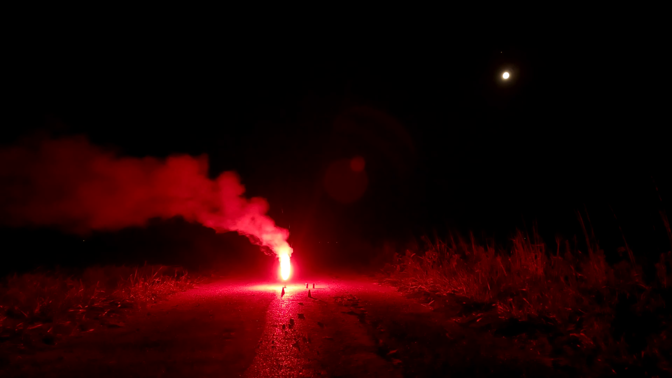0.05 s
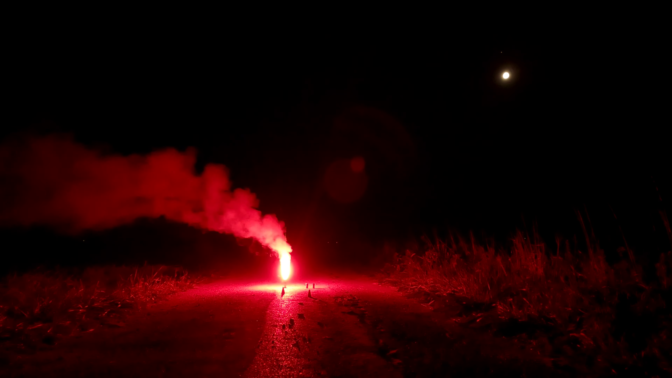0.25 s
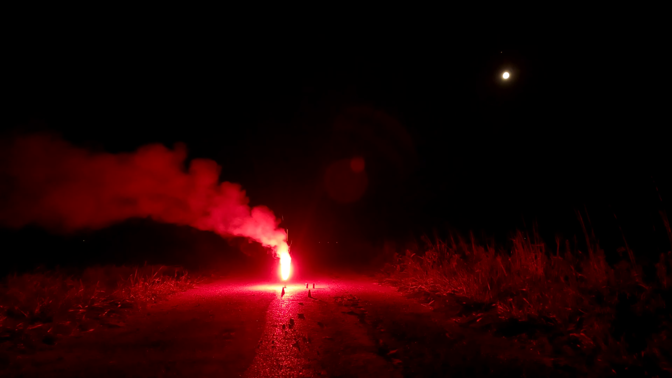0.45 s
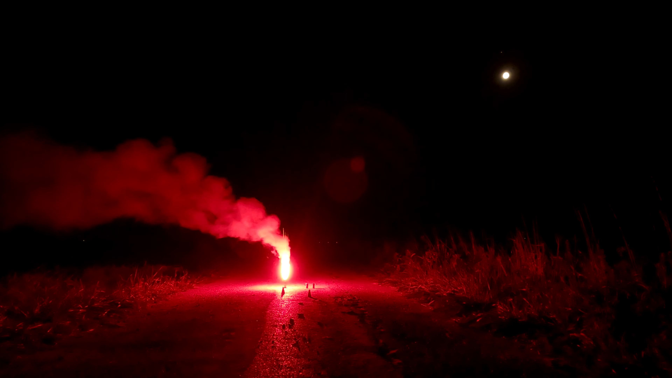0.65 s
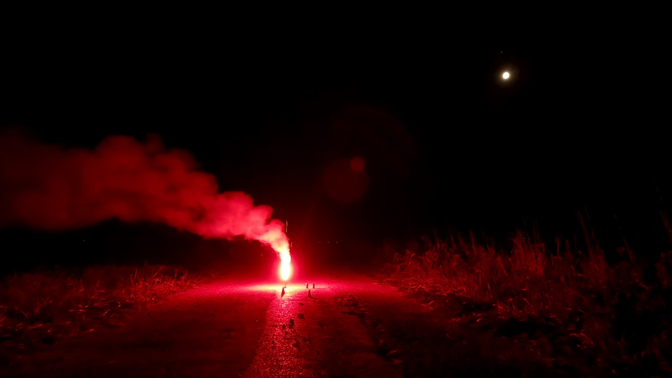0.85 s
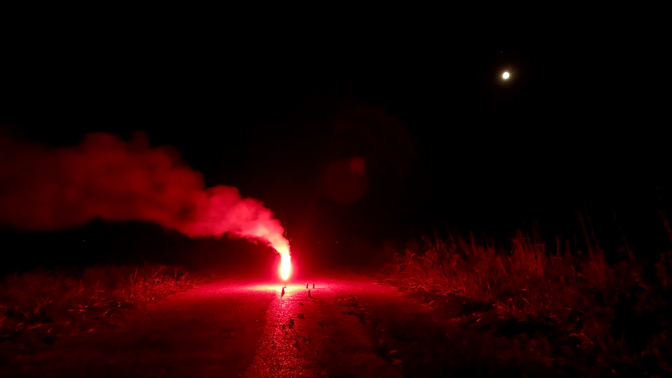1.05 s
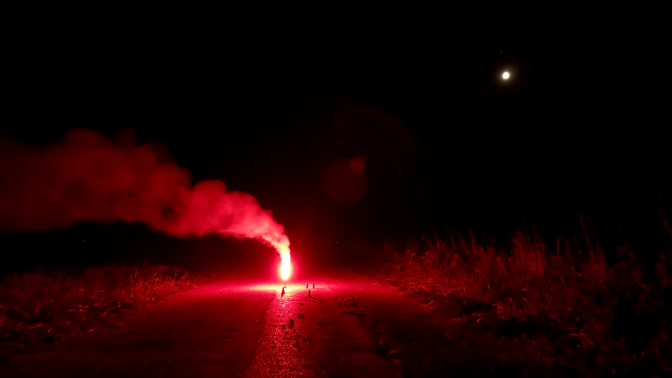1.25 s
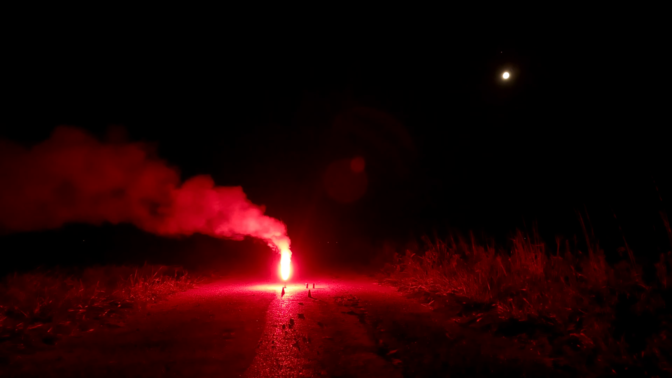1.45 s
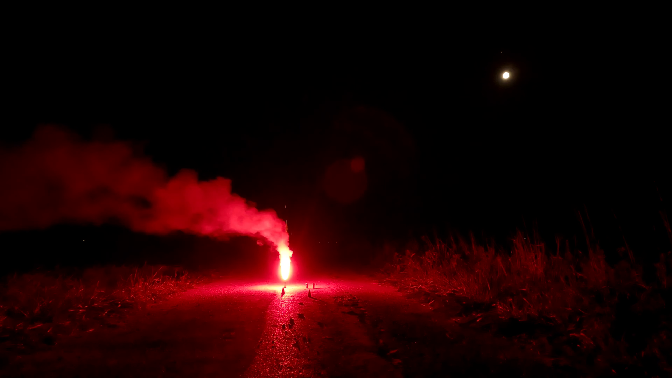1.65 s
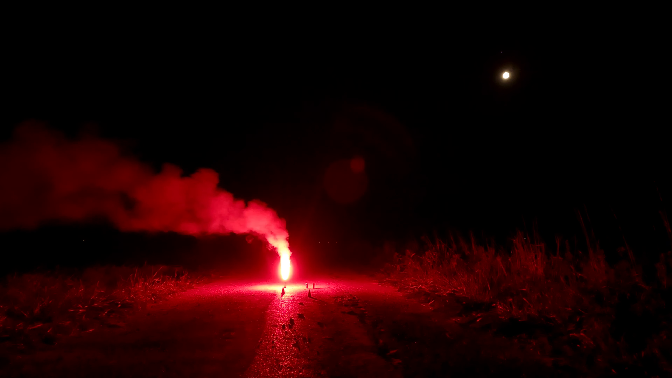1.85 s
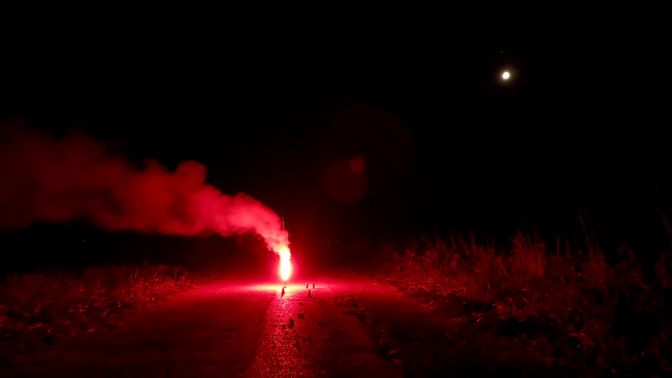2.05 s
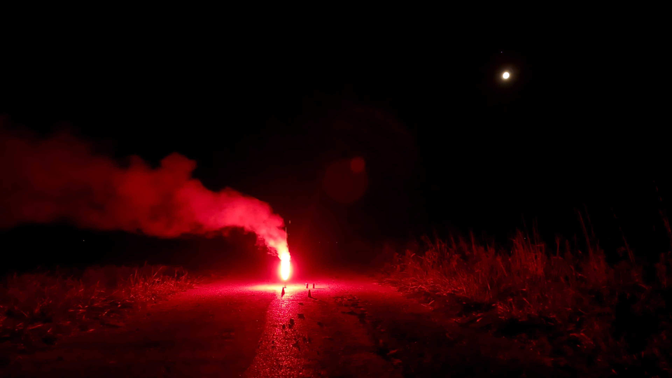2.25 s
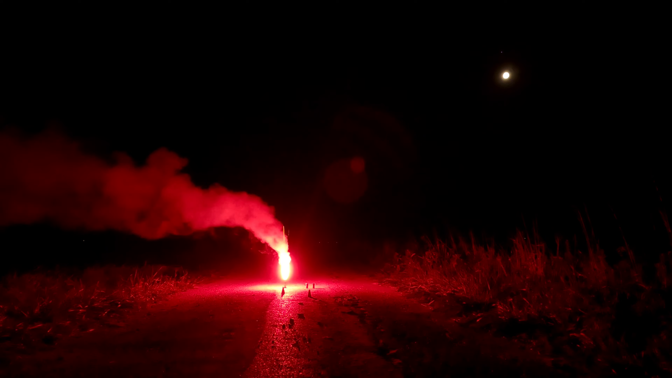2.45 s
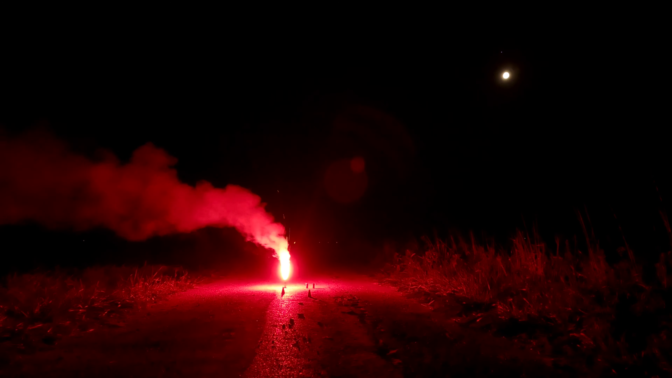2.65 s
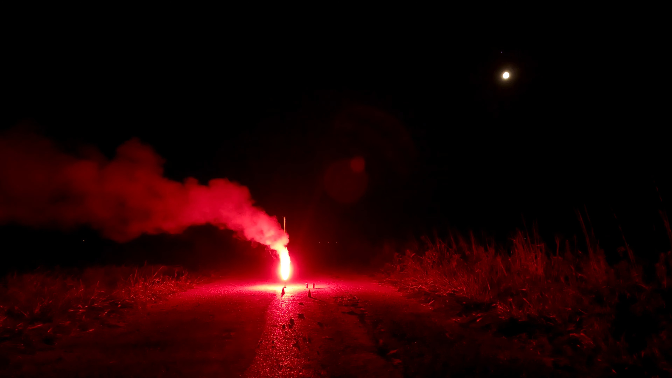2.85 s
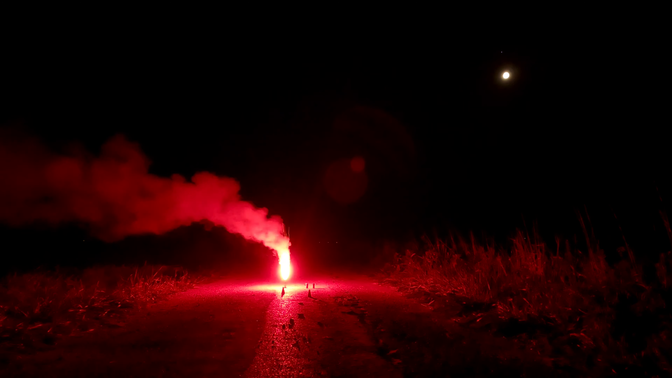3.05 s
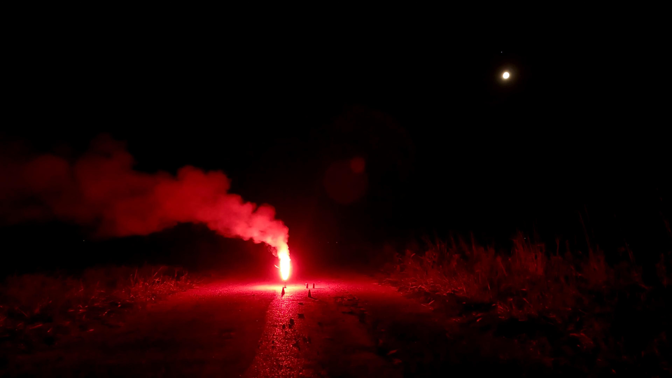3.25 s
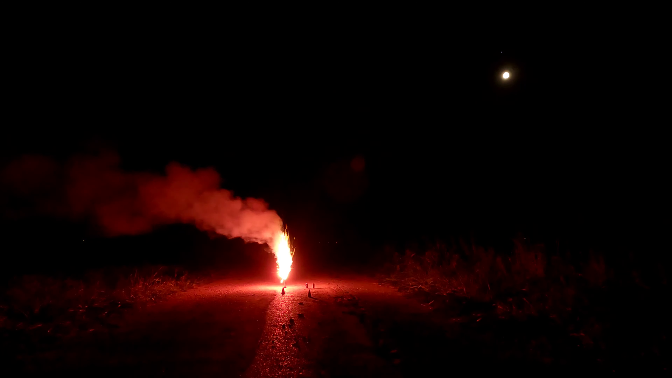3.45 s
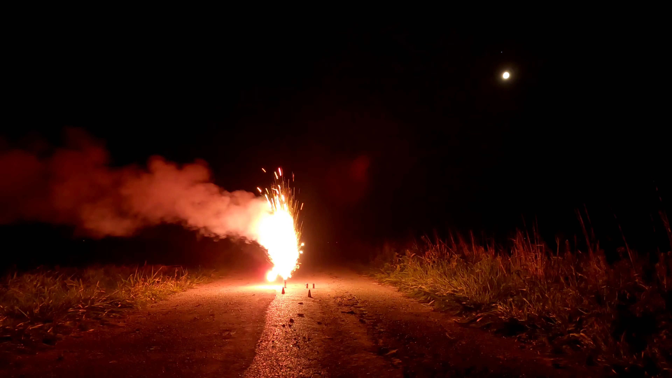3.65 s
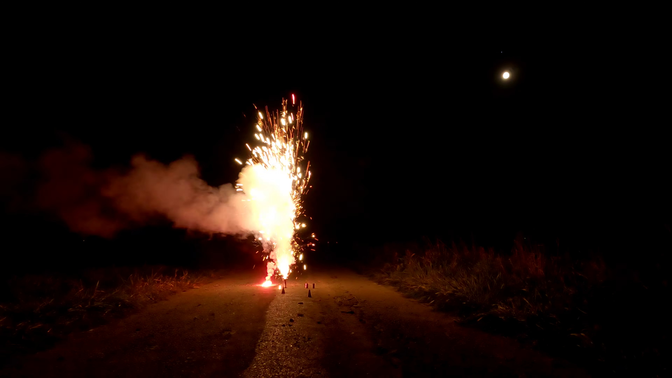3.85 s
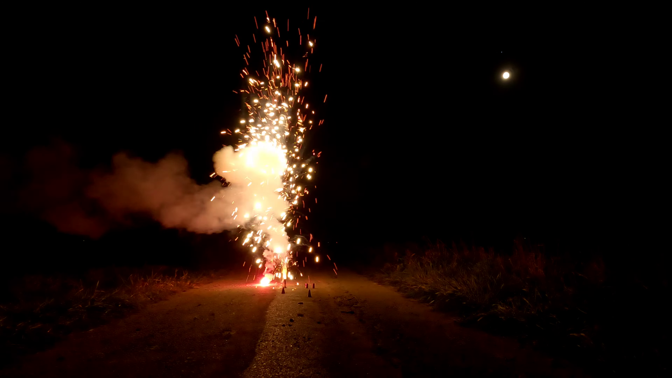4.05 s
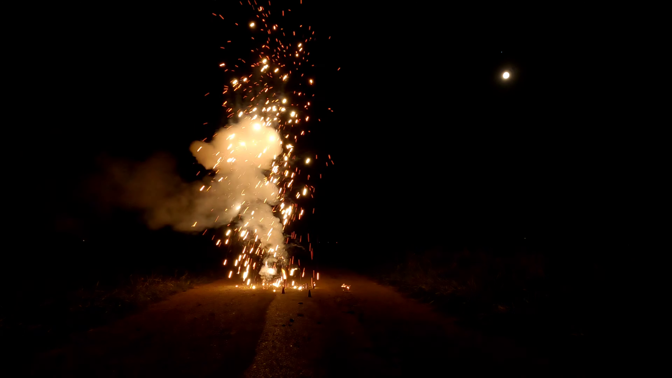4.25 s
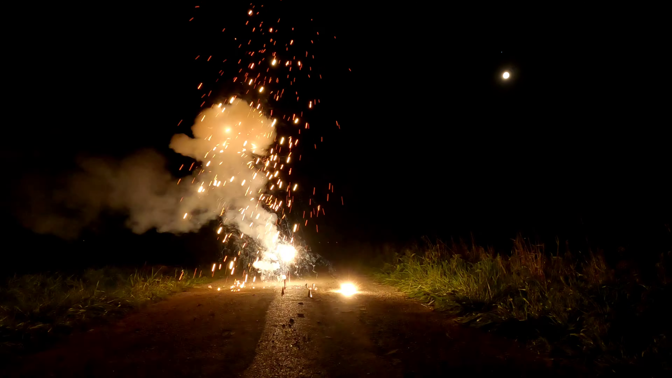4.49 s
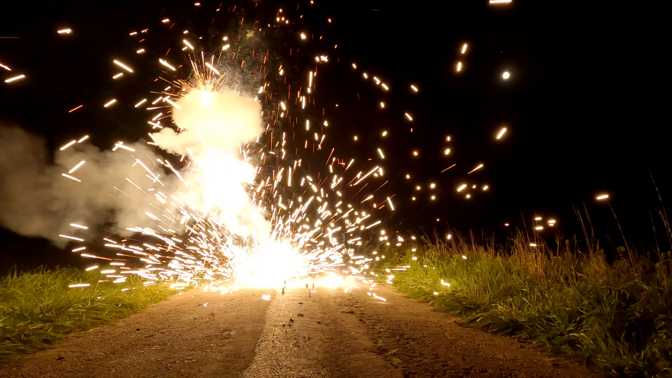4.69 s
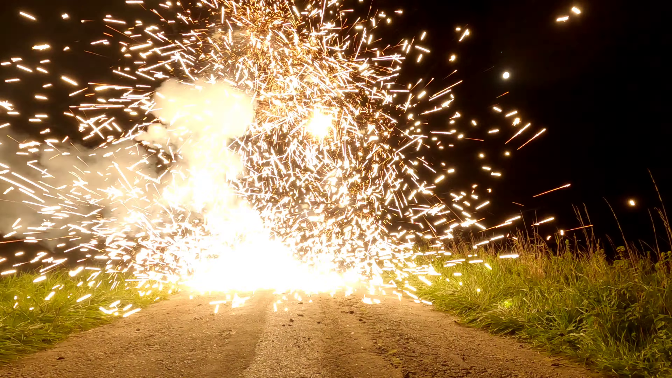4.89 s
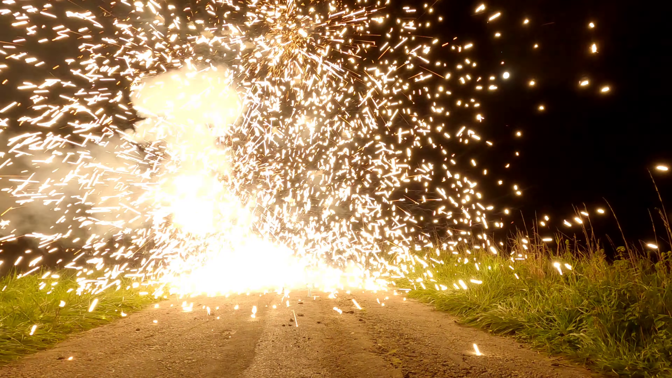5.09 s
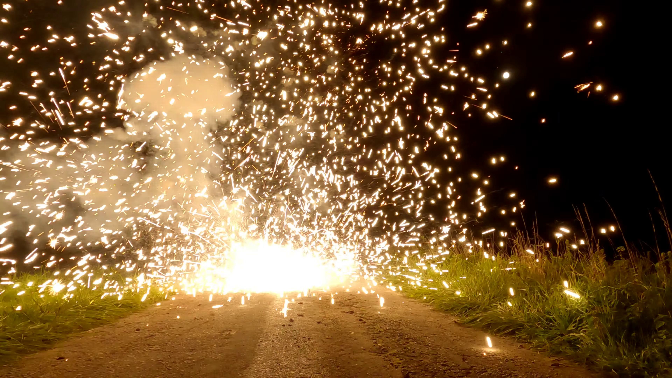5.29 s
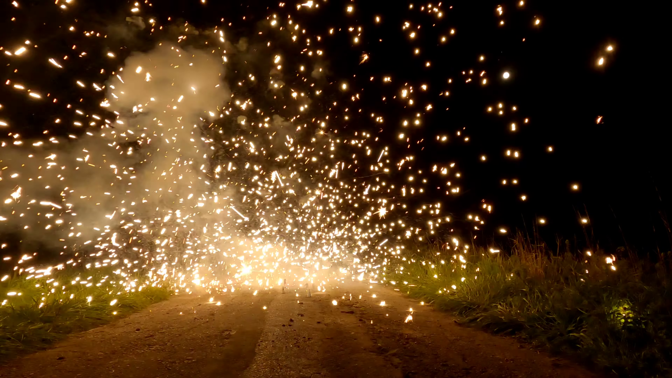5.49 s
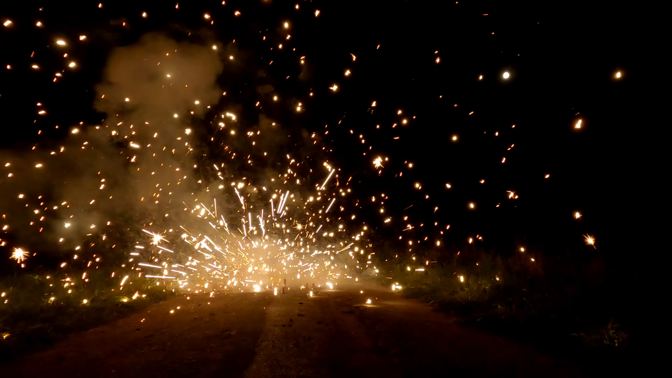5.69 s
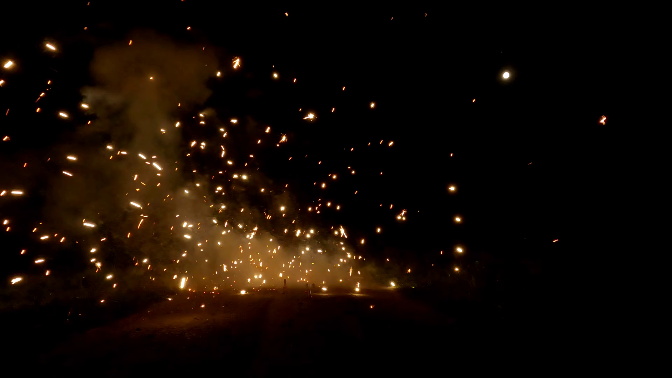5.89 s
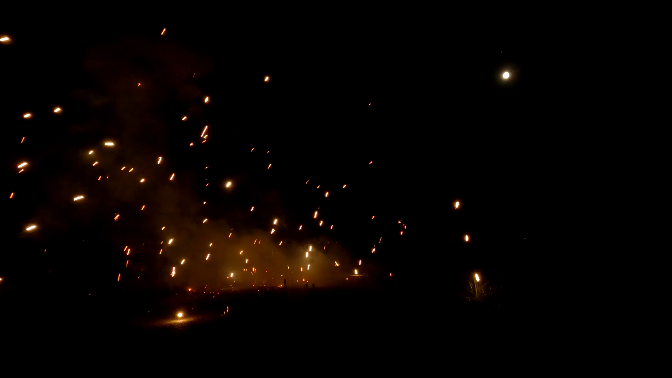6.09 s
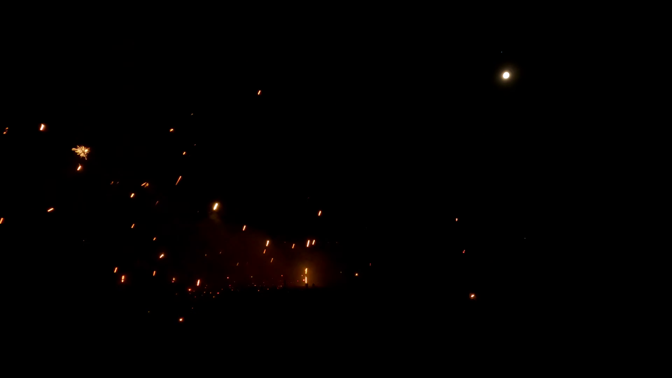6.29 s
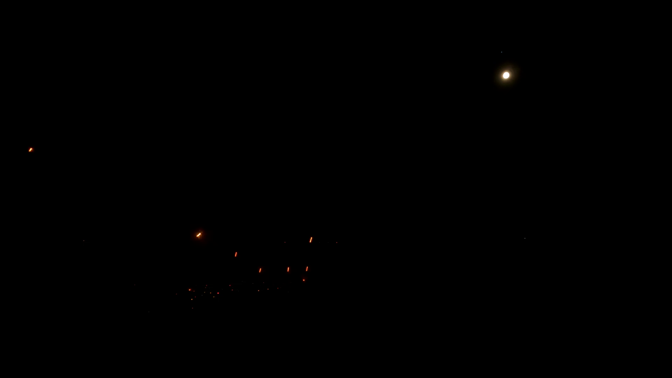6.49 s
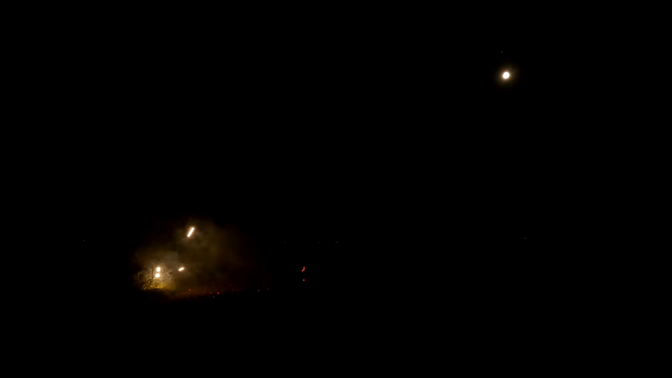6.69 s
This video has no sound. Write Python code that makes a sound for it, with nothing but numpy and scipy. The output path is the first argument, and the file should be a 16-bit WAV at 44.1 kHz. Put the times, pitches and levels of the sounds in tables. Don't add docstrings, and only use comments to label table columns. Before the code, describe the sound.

From 0 to 3.3 seconds a flare burns steadily outdoors: a broad, breathy jet hiss over a soft low roar, fluttering in the treble and swelling gently with gusts. Around 3.4 it builds into a whoosh, fullest near 3.7 and gone by 3.9, leaving a quiet low roar and fizzing sparks. Tiny sharp snaps come around 4.15 to 4.26. At 4.58 a very loud crack opens the volley; from 4.64 to 5.05 dry bangs with short thumps overlap in a dense, machine-gun-like barrage. They break into clusters until 5.45, then separate shots at 5.5, 5.63, 5.74 and 5.82. Spitting embers and faint ticks thin out through 6.3 into near-silent night air. One last isolated loud crack hits at 6.66. Scatter from road and hedges is brief; the small stereo microphone clips the loudest peaks.

```python
import sys
import numpy as np
from scipy import signal
from scipy.fft import rfft, irfft, next_fast_len
from scipy.io import wavfile

SR = 44100
rng = np.random.default_rng(int(sys.argv[2]) if len(sys.argv) > 2 else 0)


def boost(x):
    u = np.asarray(x, float) / 20
    return 10 ** u


def generate_wav(sig):
    pcm = np.round(np.clip(np.atleast_2d(sig).T, -1, 1) * 32767).astype(np.int16)
    wavfile.write(sys.argv[1], SR, pcm)


N = 296793

# frequency in Hz, left-right likeness (0-1).
LIKENESS = [(28, 0.998), (120, 1), (300, 1), (900, 0.96), (1550, 0.97), (3100, 0.87), (5200, 1), (10000, 1),
            (13500, 0.36)]
# frequency in Hz, left minus right in dB.
BALANCE = [(60, -1.5), (180, 0.5), (550, -1), (1650, -1), (4970, 1.5), (15000, 2)]

# frequency in Hz, density in dB per Hz.
NIGHT_COLOUR = [(12, -46), (20, -14), (58, -2), (134, -4.5), (184, -11), (390, -30.5), (1700, -24.5),
                (4000, -33), (12000, -70), (15600, -95), (22000, -120)]
# time in seconds, level in dB.
NIGHT_LEVEL = [(5.75, -58), (5.95, -57), (6.3, -55), (6.6, -54.5), (6.73, -49)]
FIELD_DB, FIELD_LOW_HZ, FIELD_HIGH_HZ, FIELD_T60_S = -34, 300, 1000, 1.2

# frequency in Hz, density in dB per Hz.
FLARE_COLOUR = [(15, -26), (25, -8.5), (55, 1.5), (127, -1), (450, -9.5), (1030, -14), (1750, -18),
                (2200, -15.5), (2570, -13.5), (3400, -19), (5250, -22), (5800, -32), (12200, -38),
                (15600, -58), (16200, -80)]
# time in seconds, swell in dB.
GUSTS = [(.01, 2), (.125, 0.5), (.45, 1.5), (.58, -1), (.9, 2), (1.35, 1.5), (1.45, 2.5), (1.63, 3.5),
         (1.77, 0), (2.1, 0), (2.42, 3), (3.12, 1.5), (3.28, 1.5)]
FLARE_DB, FLARE_OUT_S, FLARE_DIES_DB_PER_S = -35, 3.31, 129
FLARE_BRIGHT_DB, GUST_S, GUST_DULLS_DB_PER_DB = 0.4, 0.022, 0.6
SPUTTER_HZ, SPUTTER_DB, SPUTTER_PER_S = 5800, 3.5, 240

# frequency in Hz, density in dB per Hz.
WHOOSH_COLOUR = [(15, -47), (25, -8), (117, 3), (363, -4.5), (800, -11.5), (950, -8.5), (1700, -13.5),
                 (3450, -21.5), (4850, -22), (5800, -31.5), (12200, -38.5), (15200, -58), (16200, -74)]
# time in seconds, level in dB.
WHOOSH_LEVEL = [
    (3.36, -37),
    (3.46, -27.5),
    (3.53, -24),
    (3.64, -23),
    (3.705, -14.5),
    (3.755, -15),
    (3.785, -24.5),
    (3.825, -30),
    (3.87, -59),
]
WHOOSH_BRIGHT_DB, WHOOSH_DULLS_FROM_S, WHOOSH_DULLS_DB_PER_S = 2, 3.69, 21

# frequency in Hz, density in dB per Hz.
RUMBLE_COLOUR = [(15, -53.5), (25, -16.5), (59, -3), (133, -6), (200, -19), (340, -20.5), (440, -37.5),
                 (700, -49), (2000, -60.5)]
# time in seconds, level in dB.
RUMBLE_LEVEL = [(3.75, -41), (4.0, -44.5), (4.42, -41.5), (5.4, -45), (5.7, -54), (5.9, -62.5),
                (6.1, -67.5)]

# frequency in Hz, density in dB per Hz.
SIZZLE_COLOUR = [(240, -41.5), (400, -5.5), (800, -0.5), (1030, 6), (5100, 3.5), (7500, 1), (10700, -5.5),
                 (12200, -8), (15600, -25.5), (16200, -56)]
# time in seconds, level in dB.
FOUNTAIN_LEVEL = [(3.3, -56), (3.58, -43), (3.85, -43.5), (4.0, -48), (4.2, -50.5), (4.27, -48.5),
                  (4.36, -53), (4.45, -53), (4.56, -47.5)]
# time in seconds, level in dB.
EMBER_LEVEL = [(4.6, -49.5), (5.2, -45), (5.45, -47), (5.58, -47.5), (5.84, -53.5), (5.95, -47),
               (6.17, -54.5), (6.35, -65), (6.73, -68.5)]
FOUNTAIN_BRIGHT_DB, EMBER_BRIGHT_DB, EMBER_COOLS_DB_PER_S = 4, -1, 5.5
FOUNTAIN_GRAIN_DB, EMBER_GRAIN_DB = 1.8, 2.4
CROWD_S, CROWD_DB = 0.012, 10

# time in seconds, crack in dB, road bounce lag in ms, left minus right in dB.
TICKS = [(4.1485, -26, 1, -.6), (4.2064, -26.5, .9, 0), (4.2288, -28.3, 0, 0), (4.2357, -29.2, 0, -.8),
         (4.2407, -20.5, .9, 1), (4.2607, -18.6, 1, 0), (4.4975, -34, 0, .3), (5.8646, -38.4, 1, 0),
         (5.8966, -40.4, 1, -1), (5.9143, -39, 0, 2), (5.9163, -36, .7, 7), (5.9268, -34.4, 0, -2.6),
         (5.9293, -41, 1.2, -2), (5.969, -39.3, 0, .8), (5.9773, -35.8, 0, 1.6), (6.0374, -34, .8, 2.5),
         (6.0472, -37.6, 0, -2.4), (6.0546, -32.4, 1.1, 4.2), (6.097, -36.6, .6, 1),
         (6.1227, -29.2, .5, 1.4), (6.2548, -35.7, 0, 3.5), (6.3352, -33, .8, 2.7)]
# time in seconds, crack in dB, left minus right
# in dB.
POPS = [(4.7365, -21.8, 1.0), (5.617, -39.9, 1.0), (5.7182, -41.3, 1.0), (6.6773, -43.9, 1.0),
        (3.3122, -35.3, 1.0), (4.133, -36, 0), (4.345, -36, 0), (4.3622, -38, 0), (4.4096, -36, .5),
        (4.4884, -35, 0), (5.5626, -41, 1), (5.851, -42, 1), (5.877, -43, 2), (6.4355, -58, 2)]
BOUNCE_LOSS_DB = 1.5

# time in seconds, crack in
# dB, thump in dB, twin crack lag in ms (0 for none).
STARS = [(4.5752, -2.4, -8, 1.5), (4.6087, -14.8, -8.3, -1.5), (4.6394, -7.8, -8, 0),
         (4.6524, -10.9, -12.2, 0), (4.6824, -5.5, -5.8, 0), (4.7022, -5, -5.3, 0),
         (4.7089, -6.9, -6.7, 0), (4.7599, -12, -21, 0), (4.7604, -11.8, -5, .5),
         (4.7683, -9.7, -7, .7), (4.7724, -8.8, -13, 0), (4.7929, -7.1, -2.6, -1.3),
         (4.7949, -9.7, -10, 0), (4.8045, -8.7, -10.3, 0), (4.8078, -11, -14.5, 0),
         (4.817, -13.3, -9.7, -.7), (4.8224, -9.9, -13.8, 0), (4.8345, -7.9, -5.6, -1.2),
         (4.8429, -10.5, -11.7, 0), (4.8533, -6.6, -7, 0), (4.8634, -10.5, -6.3, -1.5),
         (4.8702, -9.5, -9, 0), (4.8845, -6.8, -6.5, 0), (4.8921, -10.7, -6, -1.4),
         (4.9022, -13, -10.3, -1.1), (4.9091, -10.3, -9.6, .5), (4.9139, -8.2, -6.9, 1.7),
          (4.9165, -11.3, -7.3, -.4), (4.9205, -14.1, -12.6, -1.4), (4.9233, -13, -12.3, -.5),
          (4.9291, -10.6, -7, 1), (4.9308, -12.8, -9.7, 1.5), (4.9362, -12.3, -12.3, 1.2),
          (4.9412, -7.6, -5.8, -1.3), (4.9522, -10.5, -16.5, 1.1), (4.963, -9.8, -11, 0),
          (4.9742, -11, -10.6, 0), (4.9756, -10.5, -7.5, 1), (4.9938, -8, -4.9, -1.2),
          (5.0104, -13, -9.7, -1.4), (5.0158, -9.1, -15.7, 0), (5.0174, -14.5, -8.9, -.6),
          (5.0338, -12.8, -8.5, -.6), (5.0425, -9.7, -13.7, 1.8), (5.0454, -13.1, -8.5, 1),
          (5.0478, -16.8, -15, 0),
         (5.0838, -6.1, -7.9, 0), (5.0875, -13.3, -7.6, .9), (5.0895, -13.5, -8, -.5),
          (5.0959, -8.1, -9.9, 0), (5.1026, -11.8, -10.6, .6), (5.1045, -14.5, -17.8, 1.5),
          (5.113, -14.8, -14.5, 1.1), (5.1395, -9.6, -5, 1.5), (5.1492, -12.1, -9, .6),
          (5.1634, -9.9, -14.5, 0), (5.1749, -18.2, -14.6, 0), (5.241, -6, -7.6, 0), (5.2413, -8, -30, 0),
          (5.2562, -8.4, -9.5, 0), (5.2586, -8, -8, 0), (5.2631, -11, -5.2, 1.4),
          (5.2666, -12.7, -17, -1.3), (5.3104, -5.4, -6.2, 0), (5.3153, -13.6, -10.7, -.6),
          (5.3198, -6.6, -8.6, 0), (5.3302, -12.4, -7.1, .5), (5.3355, -14.1, -12.4, -.3),
          (5.345, -10, -13.6, 0), (5.3476, -10.6, -10.8, 0), (5.3681, -6.8, -11.5, 0),
         (5.3948, -10.9, -12.1, 0), (5.3976, -12.9, -11.4, .4), (5.3991, -16.1, -12.6, .3),
              (5.4253, -11.4, -20.5, 0), (5.4328, -6.7, -7.4, 0), (5.4447, -10.7, -13.3, 0),
              (5.4967, -6.5, -4.1, 1.2), (5.6322, -2.7, -6.9, 0), (5.6629, -8.4, -8.7, 0),
              (5.739, -4.5, -4.3, 1.8), (5.7508, -9.2, -13, 0), (5.8179, -7.2, -9.9, 0),
              (6.6588, -1.6, -7.3, 0)]
TWIN_GAIN_DB, TWIN_TOP_DB, TWIN_THUMP_SHARE = 1.5, -9, 0.41
STAR_SPREAD_DB = 2.5

# height, peak time in ms, sharpness.
CRACK_SUCTION = (-1.12, .11, 1.55)
# height, peak time in ms, sharpness.
THUMP = [
    (.22, .6, 2.6),
    (-1, 2.67, 6.7),
    (.33, 2.8, .64),
]
# level in dB, T60 in seconds.
GROUND = [
    (-11, .005),
    (-21, .02),
    (-33, .065),
]
# frequency in Hz, density in dB per Hz.
SCATTER_COLOUR = [(200, -30.5), (500, -3.5), (1200, -6.5), (2500, -13), (5000, -1), (6500, -7.5),
                  (10500, -16.5), (12200, -14), (13500, -29.5), (16200, -55.5)]

# time in seconds, ringing in dB, puff in dB, early echo in dB.
OVERLOADS = [
    (4.5751, -23, -25, -17),
    (5.4966, -38, -60, -60),
    (5.6322, -32, -46, -44),
    (6.6587, -26.5, -45, -34),
]
# frequency in Hz, level in dB, rise time in seconds.
CROSSOVERS = [(920, 0, .015), (3400, -24, .012), (8000, -21, .015)]


def in_time(rows, fade_s=0.027):
    s, level_db = np.transpose(rows)
    t = np.arange(N) / SR
    outside_s = np.maximum(s[0] - t, 0) + np.maximum(t - s[-1], 0)
    return np.interp(t, s, level_db) - 20 * outside_s / fade_s


def at_hz(points, hz):
    table_hz, value = np.transpose(points)
    return np.interp(np.log(hz), np.log(table_hz), value)


def rms_one(x):
    return x / np.sqrt(np.mean(x ** 2) + 1e-20)


def butter(x, order, hz, kind="low"):
    return signal.sosfilt(signal.butter(order, hz, kind, fs=SR, output="sos"), x)


def drift(rate_hz):
    r = np.exp(-80 * np.pi * rate_hz / SR)
    slow = signal.lfilter([1], [1, -2 * r, r * r], rng.standard_normal(N // 40 + 2002))[2000:]
    return np.interp(np.arange(N) / 40, np.arange(len(slow)), rms_one(slow))


def turbulence(colour, flicker_db, wide=1.0, bright_db=0, first_s=0, last_s=7):
    a, b = int(first_s * SR), min(int(last_s * SR), N)
    out = np.zeros((2, N))
    together = drift(9) + .7 * drift(40)
    edges_hz = 14 * 2 ** np.arange(0, 10.6, .5)
    size = next_fast_len(b - a)
    shape = boost(at_hz(colour, np.fft.rfftfreq(size, 1 / SR) + 1))
    white = rng.standard_normal((2, 2, size))
    source = irfft(rfft(white) * rms_one(shape), size)[..., :b - a]
    wide = (wide * np.ones(N))[a:b]
    for k, (low_hz, high_hz) in enumerate(zip(edges_hz, edges_hz[1:])):
        hz = np.sqrt(low_hz * high_hz)
        mid, side = butter(source[k % 2], 2, [low_hz, high_hz], "band")
        alike = np.clip(1 - wide * (1 - at_hz(LIKENESS, hz)), 0, 1)
        tilt_db = bright_db * np.log2(hz / 1000) / 2
        gain = boost(tilt_db + flicker_db * (together + 0.5 * drift(14.0)))[a:b]
        pair = np.sqrt(1 + alike) * mid + np.sqrt(1 - alike) * side * [[1], [-1]]
        out[:, a:b] += gain * pair * boost(at_hz(BALANCE, hz) * np.array([[.5], [-.5]]))
    return out / np.sqrt(2)


def night_air():
    air = turbulence(NIGHT_COLOUR, flicker_db=2.2, wide=16.0, first_s=5.1)
    return boost(in_time(NIGHT_LEVEL)) * air


def fields(near):
    keep = boost(-120 / (FIELD_T60_S * SR))
    energy = signal.lfilter([1 - keep], [1, -keep], near[0] ** 2)
    mid, side = rms_one(butter(rng.standard_normal((2, N)), 2, [FIELD_LOW_HZ, FIELD_HIGH_HZ], "band"))
    return boost(FIELD_DB) * np.sqrt(energy) * (mid + .4 * side * [[1], [-1]])


def sputter(jet):
    top = butter(jet, 2, SPUTTER_HZ, "high")
    return jet + top * (rms_one(boost(SPUTTER_DB * drift(SPUTTER_PER_S))) - 1)


def flare_jet():
    t = np.arange(N) / SR
    gust_db = sum(swell_db * np.exp(-((t - s) / GUST_S) ** 2) for s, swell_db in GUSTS)
    level_db = FLARE_DB + gust_db - FLARE_DIES_DB_PER_S * np.maximum(t - FLARE_OUT_S, 0)
    bright_db = FLARE_BRIGHT_DB - GUST_DULLS_DB_PER_DB * gust_db
    return boost(level_db) * sputter(turbulence(FLARE_COLOUR, flicker_db=0.69, bright_db=bright_db, last_s=3.6))


def whoosh():
    t = np.arange(N) / SR
    bright_db = WHOOSH_BRIGHT_DB - WHOOSH_DULLS_DB_PER_S * np.clip(t - WHOOSH_DULLS_FROM_S, 0, .25)
    gas = turbulence(WHOOSH_COLOUR, flicker_db=.8, bright_db=bright_db, first_s=3.2, last_s=4.05)
    return boost(in_time(WHOOSH_LEVEL)) * gas


def charge_rumble():
    rumble = turbulence(RUMBLE_COLOUR, flicker_db=1.5, first_s=3.6, last_s=6.3)
    return boost(in_time(RUMBLE_LEVEL)) * rumble


def spark_sizzle(star_s):
    bursts = np.bincount((star_s * SR).astype(int), minlength=N)
    keep = np.exp(-2 / (CROWD_S * SR))
    per_span = signal.lfilter([(1 - keep) ** 2], [1, -2 * keep, keep ** 2], CROWD_S * SR * bursts + 1e-18)
    crowd_db = CROWD_DB * np.log(np.maximum(per_span / 0.59, 1))
    level_db = np.maximum(in_time(FOUNTAIN_LEVEL), in_time(EMBER_LEVEL) + crowd_db)
    ember_age_s = np.arange(N) / SR - EMBER_LEVEL[0][0]
    fountain = ember_age_s < 0
    bright_db = np.where(fountain, FOUNTAIN_BRIGHT_DB, EMBER_BRIGHT_DB - EMBER_COOLS_DB_PER_S * ember_age_s)
    hiss = turbulence(SIZZLE_COLOUR, flicker_db=.8, wide=np.where(fountain, 1.2, 5),
                      bright_db=bright_db, first_s=3.25)
    grain_db = np.where(fountain, FOUNTAIN_GRAIN_DB, EMBER_GRAIN_DB)
    grains = np.minimum(rng.exponential(1, N // 16 + 1), 6).repeat(16)[:N]
    spits = boost(grain_db * (grains - 1.4))
    return boost(level_db) * butter(hiss * spits, 6, [950, 15300], "band")


def ticks():
    s, crack_db, lag_ms, lean_db = np.transpose(TICKS)
    bounce = np.array([s + lag_ms / 1000, crack_db - BOUNCE_LOSS_DB, lean_db])[:, lag_ms > 0]
    return np.concatenate([[s, crack_db, lean_db], bounce, np.transpose(POPS)], axis=1)


def stars():
    s, crack_db, thump_db, lag_ms = np.transpose(STARS)
    chance = rng.standard_normal((len(s), 4))
    off_axis = np.clip(-crack_db / 10, 0, 1)[:, None]
    lean_db = STAR_SPREAD_DB * chance[:, :2] * off_axis
    s = s + chance[:, 2] * 4e-5
    lag_ms = lag_ms * (1 + .04 * chance[:, 3])
    twin = lag_ms != 0
    first_thump_db = thump_db + twin * 20 * np.log10(1 - TWIN_THUMP_SHARE)
    twin_thump_db = thump_db + 20 * np.log10(TWIN_THUMP_SHARE)
    twin_crack_db = np.minimum(crack_db + TWIN_GAIN_DB, TWIN_TOP_DB)
    first = np.array([s, crack_db, first_thump_db, lean_db[:, 0]])
    second = np.array([s + lag_ms / 1000, twin_crack_db, twin_thump_db, lean_db[:, 1]])
    return np.concatenate([first, second[:, twin]], axis=1)


def lobe(ms, height, peak_ms, sharp):
    u = np.maximum(ms, 0) / peak_ms
    return height * (u * np.exp(1 - u)) ** sharp


def shock(ms):
    push = np.where(ms < 0, np.exp(-np.abs(ms) / .06), np.exp(-(ms / .06) ** 2))
    return 1.2 * push + lobe(ms - .03, *CRACK_SUCTION)


def strikes(s, db, pan_db):
    train = np.zeros((2, N))
    np.add.at(train.T, np.round(s * SR).astype(int), boost(db[:, None] + pan_db[:, None] * [.5, -.5]))
    return train


def left_shadow(x):
    low = signal.sosfiltfilt(signal.butter(1, 1800, fs=SR, output="sos"), x)
    left, right = x * [[1.25], [.8]] + low * [[-.4], [.36]]
    return np.array([.65 * left + .35 * np.roll(left, 1), right])


def ground_scatter(s, crack_db):
    energy = strikes(s, np.minimum(crack_db, -9), 0 * s)[0] ** 2
    envelope = 0
    for level_db, t60_s in GROUND:
        keep = boost(-120 / (t60_s * SR))
        envelope = envelope + boost(2 * level_db) * signal.lfilter([1], [1, -keep], energy + 1e-18)
    scatter = np.sqrt(envelope) * turbulence(SCATTER_COLOUR, flicker_db=1.6, wide=6, first_s=4.5)
    return butter(scatter, 6, 13200)


def bangs(s, crack_db, thump_db, pan_db):
    tick_s, tick_db, tick_pan_db = ticks()
    big = (crack_db > -8) & (crack_db - thump_db > 3.5)
    lead = 64
    ms = (np.arange(1600) - lead) / SR * 1000
    thump = sum(lobe(ms, *phase) for phase in THUMP)
    parts = [(strikes(s[big], crack_db[big] + 2.5, pan_db[big]), shock(ms / 1.15)),
             (strikes(s[~big], crack_db[~big] + 1.05, pan_db[~big]), shock(ms / 0.8)),
             (strikes(s, thump_db, 0 * s - .6), thump),
             (strikes(tick_s, tick_db + 1.5, tick_pan_db - 1), shock(ms / 0.48))]
    direct = 0
    for train, pulse in parts:
        direct = direct + signal.oaconvolve(train, pulse[None], axes=1)[:, lead + 3:lead + 3 + N]
    direct = butter(left_shadow(direct), 6, 10800)
    return direct + ground_scatter(s, crack_db)


def scene():
    cracks = stars()
    flames = spark_sizzle(cracks[0]) + flare_jet() + whoosh() + charge_rumble()
    near = flames + night_air() + bangs(*cracks)
    return near + fields(near)


def limiter_ringing():
    out = np.zeros(N)
    ahead_s = np.arange(-1400, 0) / SR
    dull = rms_one(butter(rng.standard_normal(N), 3, [120, 1300], "band"))
    for s, ring_db, puff_db, echo_db in OVERLOADS:
        at = slice(round(s * SR) - len(ahead_s), round(s * SR))
        for hz, level_db, rise_s in CROSSOVERS:
            ring = np.sin(2 * np.pi * hz * ahead_s)
            out[at] += boost(ring_db + level_db + 20 * ahead_s / rise_s) * ring
        step = np.floor(-ahead_s / .0107)
        out[at] += boost(puff_db - 15 * step) * (step < 2) * dull[at]
        for k in (1, 2):
            out[at] += boost(echo_db - 12 * (k - 1)) * shock((ahead_s + .0106 * k) * 1000 / 2.2)
    out = signal.sosfiltfilt(signal.butter(4, 9000, fs=SR, output="sos"), out)
    return out * boost([[-3.5], [1.5]])


def top_cut(x):
    return signal.sosfilt(signal.butter(12, 16510, fs=SR, output="sos"), x)


def record(dry):
    x = np.array([.35 * dry[0] + .65 * np.roll(dry[0], 1), dry[1]]) + limiter_ringing()
    x = np.clip(butter(x, 1, 5, "high"), -.96, .96)
    x = signal.sosfilt(signal.cheby2(10, 40, 16900, fs=SR, output="sos"), x)
    return top_cut(np.clip(x, -1, 1))


dry = scene()
out = record(dry)
generate_wav(out)
```